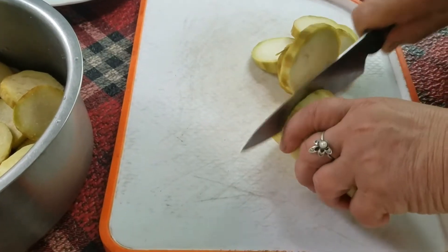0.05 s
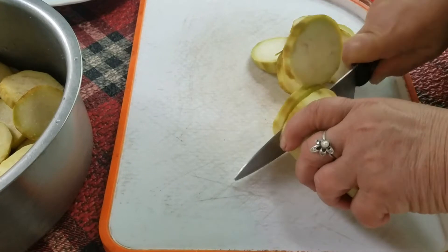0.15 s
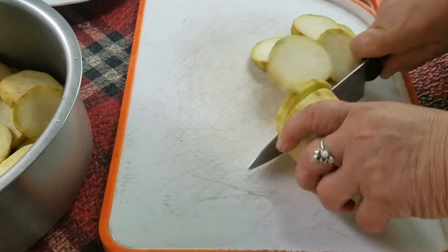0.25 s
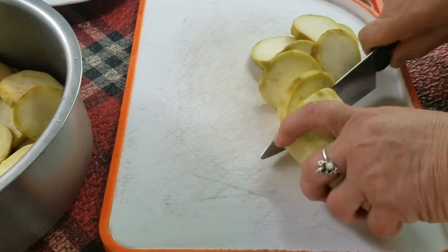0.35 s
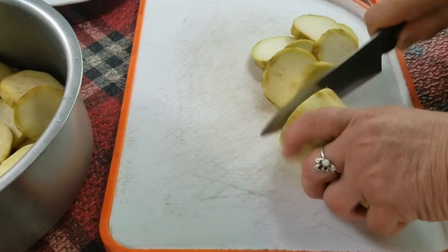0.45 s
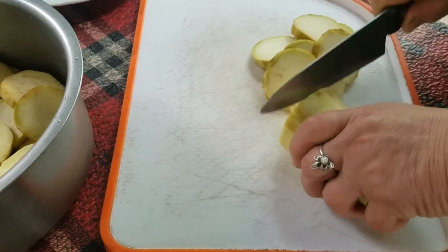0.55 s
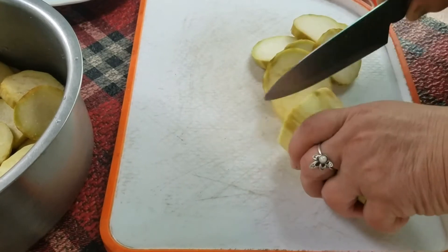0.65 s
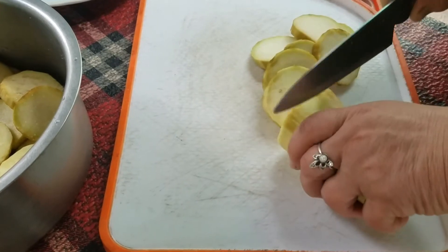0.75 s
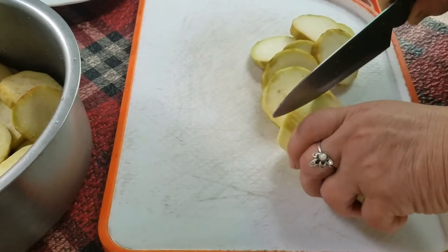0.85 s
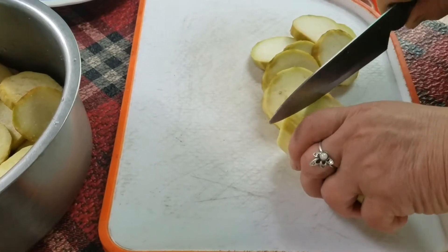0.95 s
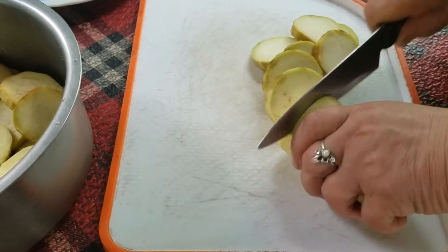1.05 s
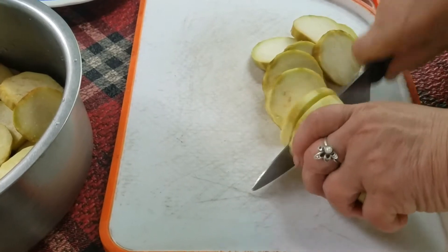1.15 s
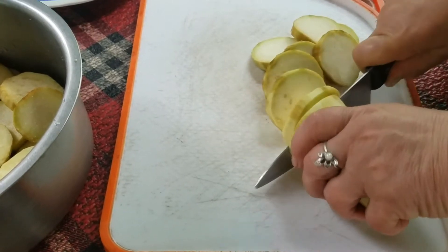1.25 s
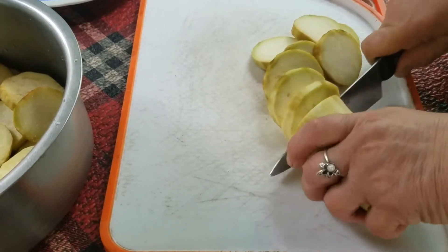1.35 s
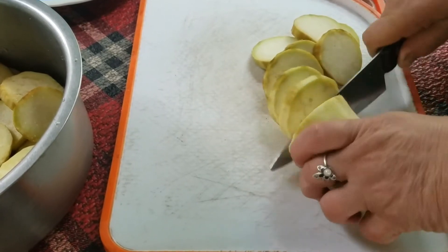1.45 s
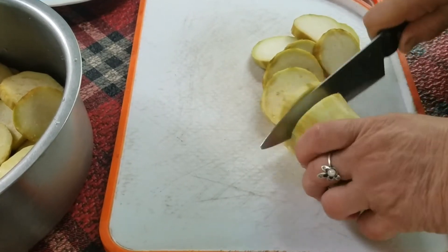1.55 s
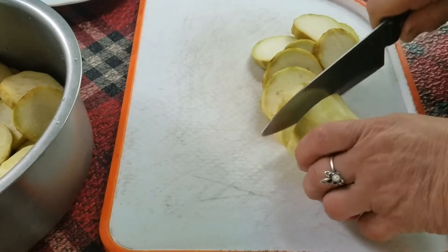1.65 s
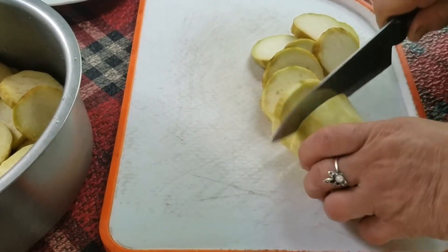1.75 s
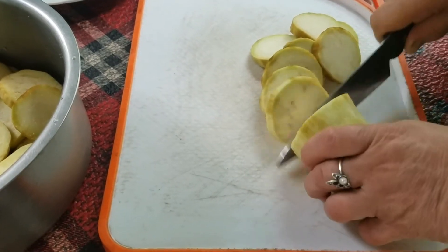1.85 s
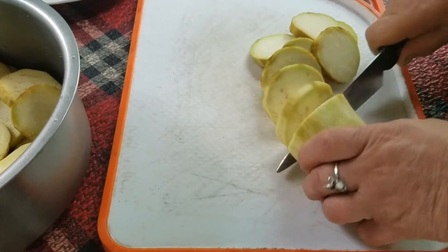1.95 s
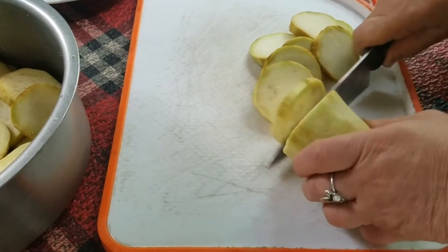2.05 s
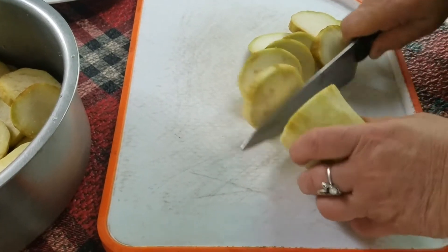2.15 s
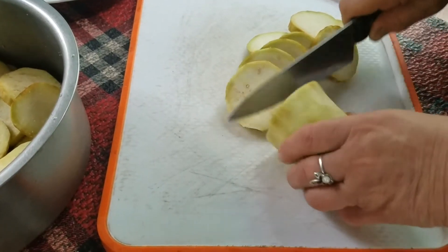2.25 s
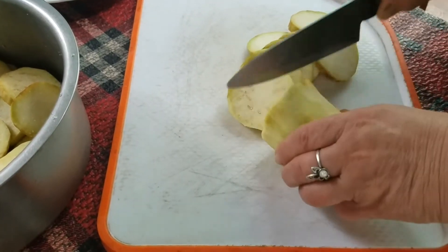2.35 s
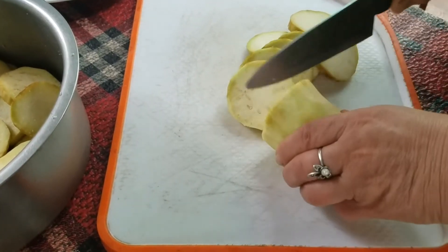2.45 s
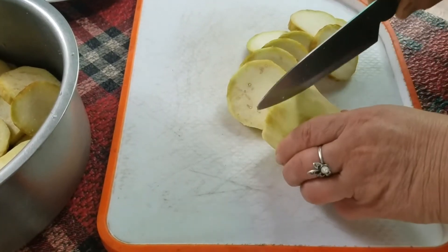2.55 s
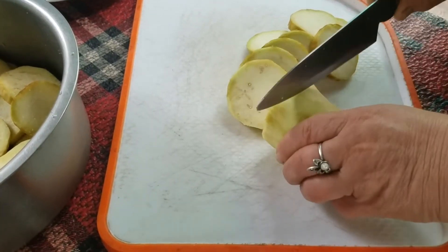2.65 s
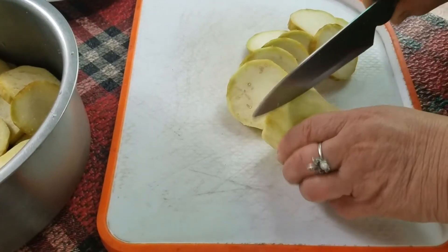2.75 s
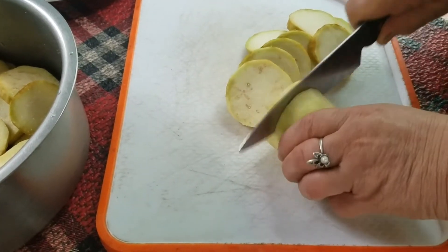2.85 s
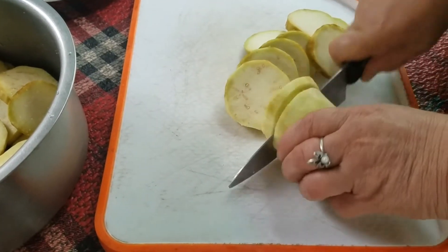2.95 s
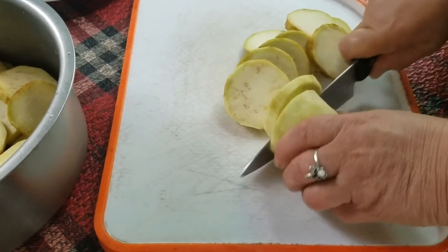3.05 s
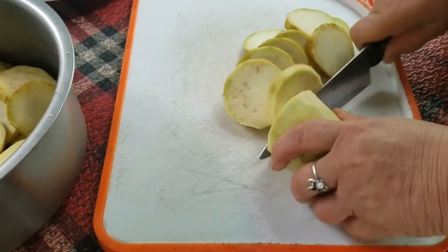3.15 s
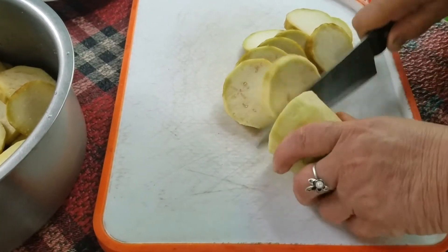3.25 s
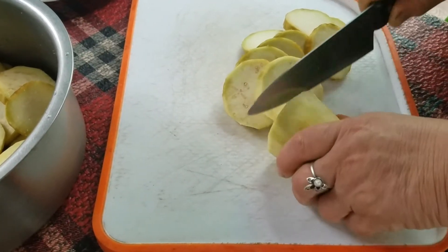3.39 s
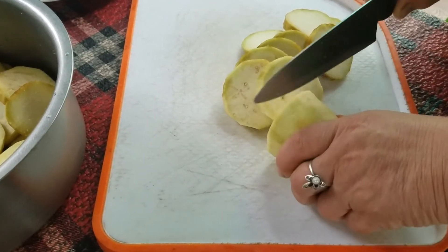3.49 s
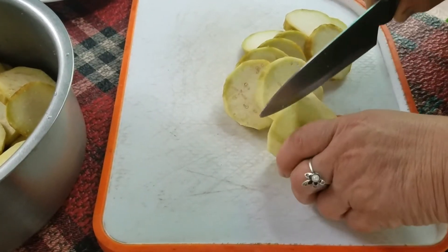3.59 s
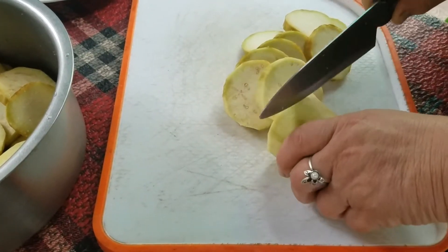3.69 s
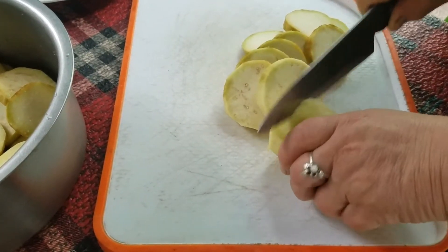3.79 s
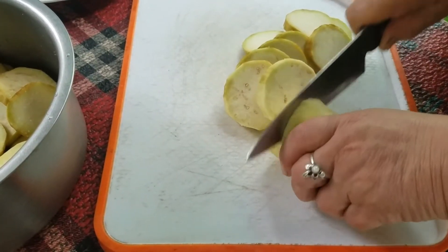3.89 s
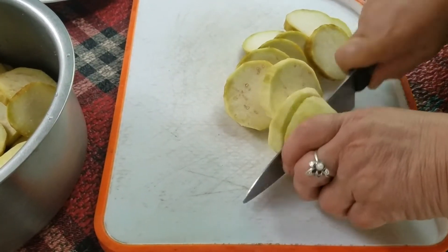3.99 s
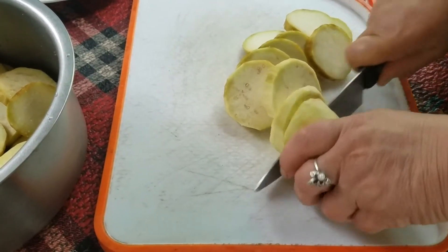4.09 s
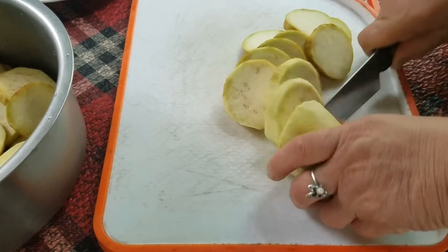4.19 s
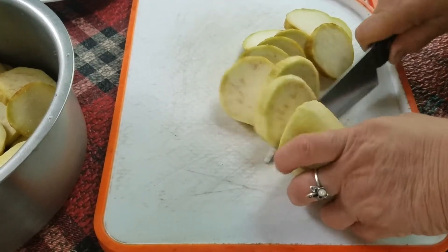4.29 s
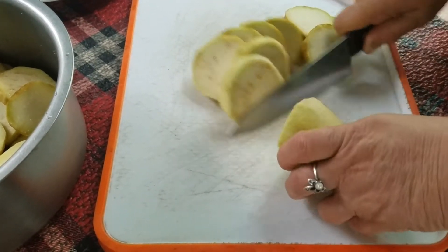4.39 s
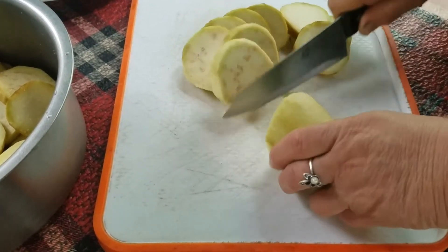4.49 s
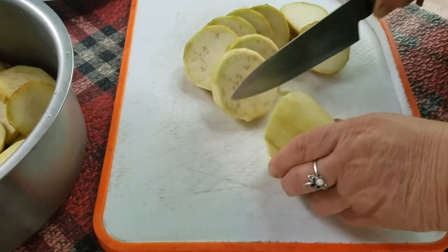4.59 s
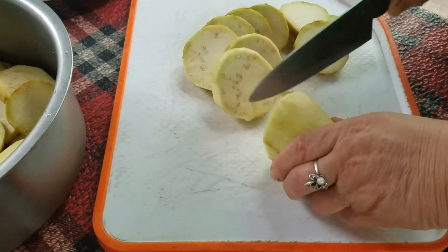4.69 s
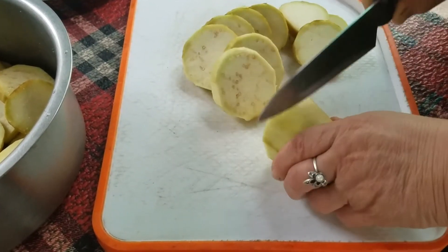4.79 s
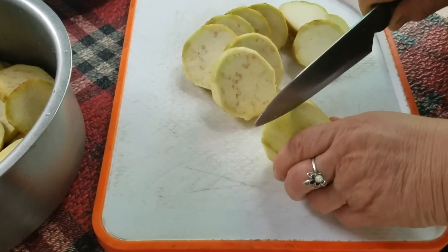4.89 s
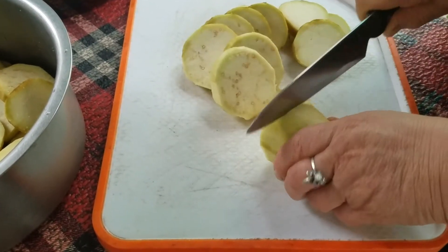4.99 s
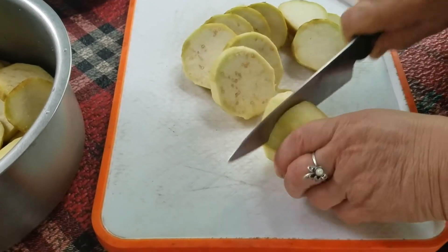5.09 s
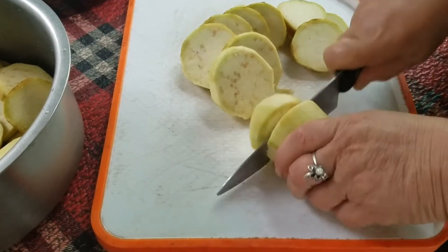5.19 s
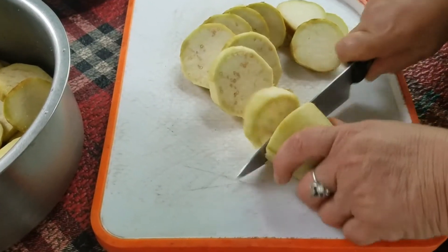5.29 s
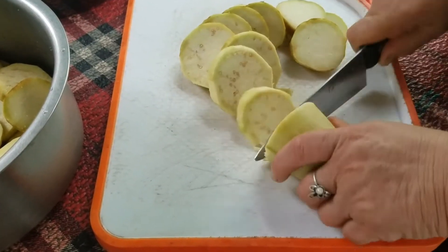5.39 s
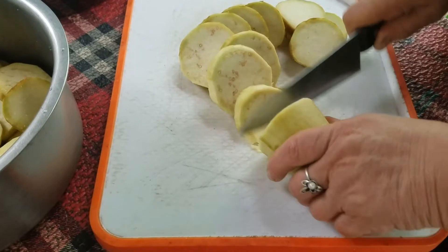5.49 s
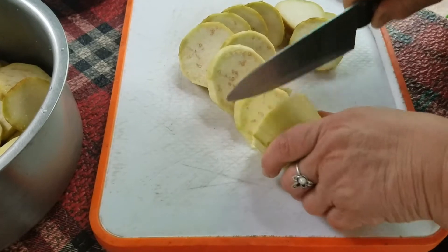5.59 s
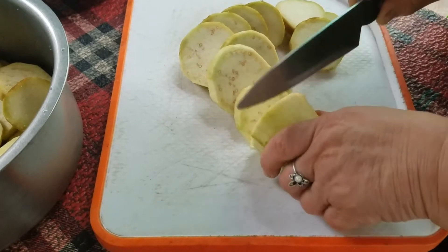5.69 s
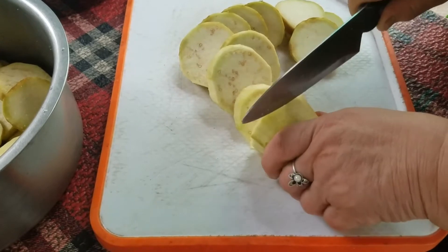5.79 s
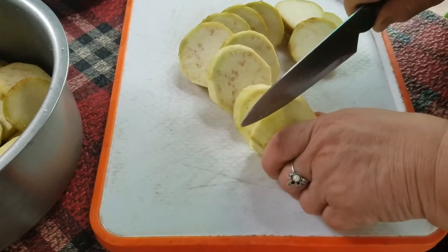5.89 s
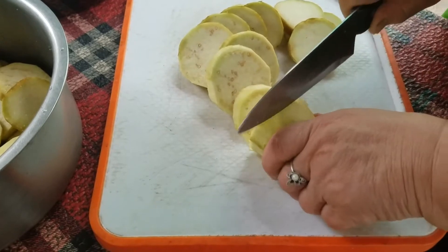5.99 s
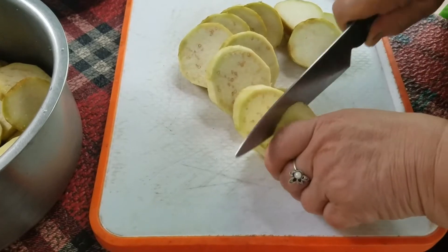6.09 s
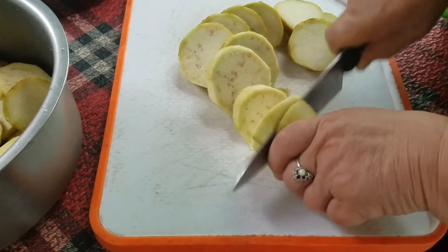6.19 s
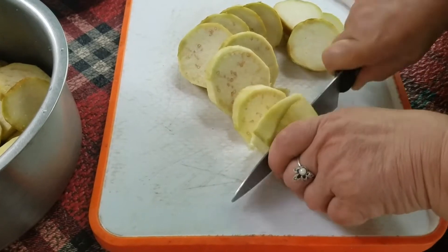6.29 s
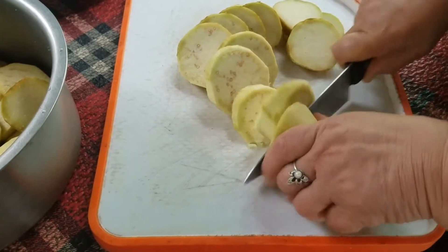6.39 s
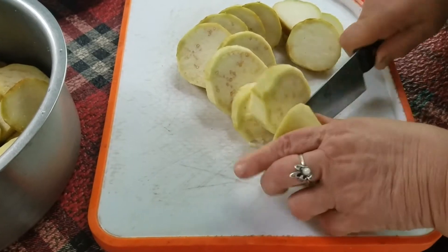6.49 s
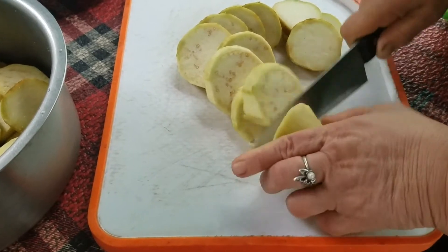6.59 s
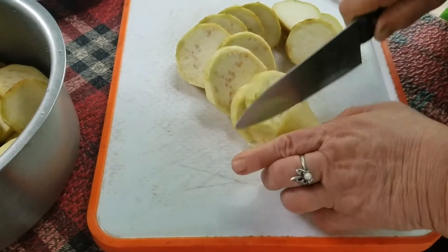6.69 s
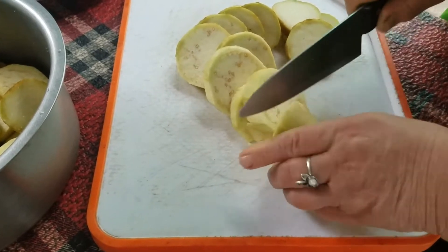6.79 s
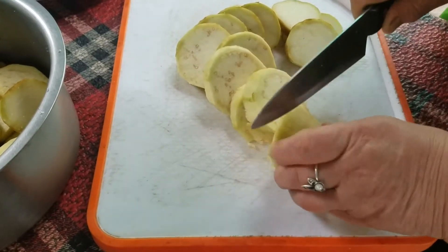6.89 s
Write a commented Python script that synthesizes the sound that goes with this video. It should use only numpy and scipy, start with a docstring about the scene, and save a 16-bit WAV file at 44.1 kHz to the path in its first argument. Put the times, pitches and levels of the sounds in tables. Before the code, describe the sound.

Close stereo microphone, small dry kitchen. A low airy rush with faint hums and uneven rumble continues throughout. Over it, a blade cuts firm, juicy vegetable six times: a gritty crunch swelling into a woody-plastic clack, a tearing slice, a quiet slippery withdrawal. There is a longer gap between the second and third cuts, with a short rasping scrape. Two tiny scrapes follow the fourth, and dull short echoes answer the knocks.

```python
"""In a small kitchen, a knife slices a courgette on a plastic cutting board lying on a cloth, close by.
Six strokes snap the skin, crunch through the flesh as clumped grains and knock on the board's modes;
each slice tears free and the wet blade slides back out. Three short scrapes of the edge shake the board.
Dull echoes and a short tail answer the knife over filtered noise: a rush with hums, rumble and hiss."""
import sys
import numpy as np
from scipy import signal
from scipy.fft import rfft, irfft, next_fast_len
from scipy.io import wavfile
from scipy.ndimage import uniform_filter1d

SR = 44100
rng = np.random.default_rng(int(sys.argv[2]) if len(sys.argv) > 2 else 0)


def output_pcm(signal):
    """Save a mono or channel-first signal as 16-bit PCM at the path in sys.argv[1].

    Samples are clipped to [-1, 1] before scaling.
    """
    pcm = np.clip(np.atleast_2d(signal).T, -1, 1) * 32767
    wavfile.write(sys.argv[1], SR, np.round(pcm).astype(np.int16))


N = 306054  # length [samples]

# In spectra and modes, levels are relative: they shape a layer before its gain is set.

# The edge meets the board: (time [s], force [dB], contact hardness [Hz], settling trim [dB],
# relative table thump [dB], relative edge click [dB], blade ring [Hz], relative blade ring [dB],
# wet split [dB])
CHOPS = [(0.1775, 20, 1490, 3, -7, -4, 2620, -3, -40.5),
         (1.2063, 19.5, 1460, -2.5, -12.5, 3, 1310, -2, -44), (2.986, 23.5, 1500, 0, 2, 1.5, 2700, -1, -32),
         (4.0167, 19.5, 1475, 0, 1, -8, 2320, -15, -35.5), (5.227, 20, 1230, -4.5, 1, -13, 1810, 4, -41),
         (6.277, 19.5, 1670, 1.5, 5, -2.5, 3350, -4, -34)]
# Soft bumps of the blade, damped by the vegetable: (time [s], force [dB], pitch [Hz])
BLADE_BUMPS = [(1.954, 14, 378), (2.809, 13, 226), (2.815, 12, 198), (4.311, 8, 324), (4.337, 7, 400)]
# Modes of the board with the blade on it:
# (frequency [Hz], width [Hz], relative level [dB], left over right [dB])
BOARD_MODES = [(327.4, 23, -4, -4), (455.6, 49, 4.5, -8), (546, 93, 7.5, -2), (673, 46, 7.5, -4),
               (771, 160, -5, 6), (1038, 238, 2.5, 7), (1118, 14, -0.5, -18), (1358, 166, 0.5, -7),
               (1842, 195, 7, -7.5), (2193, 140, 9, -3), (2590, 130, 0.5, 11), (3090, 57, -3, -13),
               (3250, 94, -3, 18)]
# The blade settles after a chop: (delay [s], relative level [dB], hardness [Hz])
SETTLING = [(.0025, -7, 1960), (.0071, -23.5, 9100), (.00926, -2, 570), (0.0113, -5.5, 830)]
# The stroke around each chop: (time in the flesh [s], push build-up [s], juice fizz at full push [dB],
# crunch at full push [dB], board drag at full push [dB], fastest pull-back after the chop [s],
# pull-back gain before the layer mix [dB])
STROKES = [(0.19, 0.1, -49.5, -38.5, -33, 0.13, -62.5), (0.192, 0.075, -52, -39.5, -34.5, 0.17, -63.5),
           (0.179, 0.061, -51.5, -39, -35, 0.13, -63.5), (0.115, 0.045, -50.5, -38, -33, 0.16, -60),
           (.19, .05, -49.5, -41.5, -34.5, .145, -61), (0.113, 0.044, -51.5, -39, -37, .175, -63.5)]
# Small snaps of the skin against the blade: (time [s], fizz [dB], t60 [s])
SKIN_SNAPS = [(1.017, -53, 0.18), (2.802, -48.5, 0.21), (3.815, -53, 0.14), (3.831, -54.5, 0.26),
              (5.031, -50.5, 0.17), (6.041, -51, 0.044), (6.065, -50.5, 0.06), (6.091, -53, .1),
              (6.143, -59, 0.035), (6.171, -59, .15)]
# The blade's high modes: (frequency [Hz], width [Hz], relative level [dB])
STEEL_MODES = [(4910, 41, -1), (5320, 76, 8), (6680, 110, -3.5), (7750, 190, -11), (8500, 83, -1.5),
               (9750, 56, -3), (10600, 94, 1), (11000, 32, -8), (12600, 41, -4), (14100, 56, -7),
               (15000, 58, -1), (15300, 38, -9)]
# Bursting cells: (frequency [Hz], relative level [dB])
FIZZ_SPECTRUM = [(2500, -4), (4000, 5), (5500, -6.5), (8000, 2.5), (9500, -3.5), (13000, 2.5), (15500, -1)]
# Breaking flesh: (frequency [Hz], relative level [dB])
CRUNCH_SPECTRUM = [(500, -3), (900, -3), (1500, 2), (2300, 1), (3000, -6.5), (4500, -10.5), (7000, -28),
                   (12000, -47)]
# The slice comes free: (frequency [Hz], relative level [dB])
SPLIT_SPECTRUM = [(1200, -21), (2200, 3), (3400, 3.5), (4400, -8.5), (6000, -19), (12000, -31)]
# Wet flesh rubbing the flat of the blade: (frequency [Hz], relative level [dB])
SUCK_SPECTRUM = [(1500, 2), (3000, -2), (4100, -9), (5200, -8), (9000, -22)]
# The blade lets go of a slice: (frequency [Hz], relative level [dB])
TICK_SPECTRUM = [(6000, -22), (9500, -12), (11000, 2), (15500, -5)]
# The edge scrapes over the board: (time [s], attack [s], hold [s], starting fizz [dB], rasp [dB],
# drag on the board [dB], blade ring [Hz])
SCRAPES = [(2.055, 0.039, 0.044, -50.5, -34.5, -34.5, 1077), (4.305, 0.0044, 0.032, -63, -47, -47.5, 1884),
           (4.385, 0.0088, 0.032, -51, -40, -43.5, 1863)]
# Edge on textured plastic: (frequency [Hz], relative level [dB])
RASP_SPECTRUM = [(600, -10.5), (1100, 4.5), (1450, 3), (1900, 0), (2700, -8), (4000, -16.5), (7000, -31),
                 (12000, -51)]
# Stereo of the close sounds: (frequency [Hz], left-right likeness)
NEAR_LIKENESS = [(300, 1), (1000, 0.84), (2500, 0.62), (5000, 0.28), (12000, 0.11)]
# Decay of the kitchen: (frequency [Hz], t60 [s])
KITCHEN_DECAY = [(120, 0.3), (500, 0.25), (2000, 0.21), (5000, 0.26), (12000, 0.12)]
# Wall echoes: (delay [s], level before dulling [dB])
WALL_ECHOES = [(0.0193, -22.5), (.0262, -31), (.0355, -21), (.0415, -29)]
# Low rumble: (frequency [Hz], relative level [dB])
RUMBLE_SPECTRUM = [(20, -20), (35, -7), (52, -1), (70, 1), (100, 1.5), (200, 1), (300, -6), (500, -13),
                   (1000, -65.5)]
# Swells of the rumble, before its trim: (time [s], relative level [dB])
RUMBLE_LEVEL = [(0.0, -53.5), (0.6, -63.5), (1.22, -58), (1.82, -62), (2.18, -53.5), (2.42, -48.5),
                (2.9, -44), (3.13, -54), (3.61, -53), (4.02, -44.5), (4.41, -51.5), (5.26, -45.5),
                (5.53, -51.5), (5.86, -51.5), (6.24, -42), (6.63, -52), (6.94, -48)]
# Fan-like rush: (frequency [Hz], relative level [dB])
RUSH_SPECTRUM = [(20, -20), (55, -4.5), (110, -17.5), (300, -2), (520, -3), (800, 2), (1080, 2.5),
                 (1300, -5), (2000, -9.5), (3000, -22), (4300, -29.5), (5400, -31), (7000, -39.5),
                 (12000, -36.5)]
# Swells of the rush, before its trim: (time [s], relative level [dB])
RUSH_LEVEL = [(0.0, -47), (0.6, -52), (1.29, -47), (1.72, -50.5), (2.18, -47.5), (2.94, -48), (3.19, -54.5),
              (3.63, -54.5), (4.02, -46), (4.41, -53.5), (5.22, -44.5), (5.51, -50.5), (5.8, -50.5),
              (6.22, -44), (6.65, -53), (6.94, -52.5)]
# Narrow tones in the rush: (frequency [Hz], width of one of two filter passes [Hz], level [dB])
HUMS = [(1071.5, 32, -61.5), (678.6, 17, -67.5), (51.5, 3.8, -65)]
# Stereo of the rumble and rush: (frequency [Hz], left-right likeness)
BACKGROUND_LIKENESS = [(60, 1), (150, 0.95), (380, 0.7), (950, -0.16), (2380, -0.078), (5980, 0.05),
                       (15000, -0.24)]
# Bands of the airy hiss: (frequency [Hz], width of one of two filter passes [Hz],
# relative level [dB])
AIRY_BANDS = [(3260, 400, 2), (5200, 510, -4), (7350, 540, -9), (11300, 900, -13)]
# The airy hiss swells up: (time [s], hold [s], level [dB])
AIRY_SWELLS = [(.48, 0.38, -66.5), (1.38, .35, -74)]
# Steady faint hiss: (frequency [Hz], relative level [dB])
HISS_SPECTRUM = [(3000, -12), (8000, 5.0), (9500, -16), (13000, 4), (15500, 3)]
# Stereo of the hiss: (frequency [Hz], left-right likeness)
HISS_LIKENESS = [(3000, 0.13)]

PUSH_S = 0.09  # the hand starts to bear down this long before the chop
PUSH_FIZZ_DB, PUSH_CRUNCH_DB, PUSH_DRAG_DB = 7, 11.5, 12  # what the full push adds to each layer
BITE_S, STOP_S = 0.0045, 0.0079  # fade-in at the bite, fade-out once the edge is on the board
PULL_RISE_DB_PER_S, PULL_HOLD_S, PULL_FALL_DB_PER_S = 78, 0.011, 188
SCRAPE_T60_S = 0.11
SCRAPE_BRIGHTEN_DB_PER_S = 112  # the fizz grows as the edge gathers speed
TICK_S, TICK_DB, TICK_T60_S = 1.560, -53, 0.077
TOP_HZ = 16000  # band limit of the output


def amp(db):
    """Decibels to gain."""
    return 10 ** (np.asarray(db) / 20)


def unit(x):
    """Scale to rms 1."""
    return x / np.sqrt(np.mean(x ** 2) + 1e-20)


def along(points, hz):
    """Read a curve of (Hz, value) points on a log frequency axis."""
    f, v = np.transpose(points)
    return np.interp(np.log(hz + 1), np.log(f + 1), v)


def filtered(x, response):
    """Filter x by a complex response of frequency."""
    m = next_fast_len(N + SR // 4)
    f = np.fft.rfftfreq(m, 1 / SR)
    return irfft(rfft(x, m) * response(f), m)[..., :N]


def resonance(f, hz, width):
    """One damped mode: a wider peak rings for a shorter time."""
    return 1j * f * width / (hz * hz - f * f + 1j * f * width)


def contact(f, hardness_hz):
    """A softer contact lasts longer and so holds less treble."""
    return 1 / np.sqrt(1 + (f / hardness_hz) ** 4)


def spread(pair, spectrum, likeness):
    """Turn two unrelated signals into coloured stereo of rms 1, as alike left to right as asked."""
    def colour(f):
        turn = np.arccos(np.clip(along(likeness, f), -1, 1)) / 2
        return amp(along(spectrum, f)) * np.array([np.cos(turn), np.sin(turn)])

    mid, side = filtered(pair, colour)
    return unit(np.array([mid + side, mid - side]))


def grains(rate):
    """Two trains of tiny snaps of uneven size, on average rate a second."""
    return (rng.random((2, N)) < rate / SR) * rng.standard_normal((2, N))


def clumped(rate, rough_db, size):
    """Grains whose loudness swells in bunches about size samples long."""
    wander = unit(uniform_filter1d(rng.standard_normal(N), size=size))
    return amp(rough_db * wander) * grains(rate)


def level(points):
    """One gain per sample from (s, dB) points."""
    return amp(np.interp(np.arange(N) / SR, *np.transpose(points)))


def envelope(s, attack, hold, t60):
    """A gain that rises from time s, holds and dies away."""
    age = np.arange(N) / SR - s
    return np.clip(age / attack, 0, 1) * amp(-60 * np.clip((age - attack - hold) / t60, 0, 2))


def burst(s, db, t60):
    """A gain that jumps up at time s and dies away."""
    age = np.arange(N) / SR - s
    return (age >= 0) * amp(db - 60 * np.clip(age / t60, 0, 2))


def add(track, s, spectrum, size=8192):
    """Put a short sound, given as a spectrum, into the track at time s."""
    lead = size // 16  # room for what falls ahead of the hit
    sound = np.roll(irfft(spectrum), lead, axis=-1)
    start = round(s * SR) - lead
    track[:, start:start + size] += sound[:, :N - start]


def board(f):
    """The board's modes at both ears; chance strengths stand for where it is touched."""
    chance_db = 1.1 * rng.standard_normal(len(BOARD_MODES))
    total = 0
    for (hz, width, db, pan), touch_db in zip(BOARD_MODES, chance_db):
        ears_db = db + touch_db + np.array([[pan], [-pan]]) / 2
        total = total + amp(ears_db) * resonance(f, hz, width)
    return total


def knocks(size=8192):
    """Blows push the board away; the blade settles in softer contacts and the table thumps below."""
    out, f = np.zeros((2, N)), np.fft.rfftfreq(size, 1 / SR)
    for s, db, hardness_hz, settle_db, thump_db, click_db, blade_hz, blade_db, _ in CHOPS:
        again = 0
        for delay, settling_db, hz in SETTLING:
            late = np.exp(-2j * np.pi * f * delay)
            again = again + amp(settling_db + settle_db) * late / (1 + (f / hz) ** 2)
        click = amp(click_db + np.array([[2.5], [-2.5]])) * resonance(f, hz=6350, width=2500)
        # the blade's pitch depends on where the flesh grips it
        blade = amp(blade_db) * resonance(f, blade_hz, width=160)
        ring = (board(f) + blade + click) * (1 + again) * contact(f, hardness_hz)
        table = amp(thump_db + 3.5) * resonance(f, hz=143.0, width=25.7)
        crack = amp(-38) * resonance(f, hz=11000, width=9000)  # steel biting into plastic
        add(out, s, amp(db) * (table - ring + crack))
    for s, db, hz in BLADE_BUMPS:
        bump = resonance(f, hz, width=106) * contact(f, hardness_hz=1500)
        add(out, s, -amp([[db], [db]]) * bump)
    return out


def fizz(steel_db):
    """Dense tiny snaps, heard directly and through the blade's high modes."""
    def blade(f):
        return sum(amp(db) * resonance(f, hz, width) for hz, width, db in STEEL_MODES)

    snaps = spread(grains(rate=16000), FIZZ_SPECTRUM, NEAR_LIKENESS)
    steel = unit(filtered(snaps, blade))
    return unit(snaps + amp(steel_db) * steel)


def drag(hardness_hz):
    """Small slips of the blade shake the board, with its upper modes dulled."""
    slips = grains(rate=2000)[0]
    return unit(filtered(slips, lambda f: board(f) * contact(f, hardness_hz)))


def slicing():
    """The blade snaps the skin, cuts through the flesh, frees the slice and slides back out."""
    # fibres give way in bunches
    crunch = spread(clumped(rate=5000, rough_db=1.7, size=220), CRUNCH_SPECTRUM, NEAR_LIKENESS)
    juice = fizz(steel_db=-11.0)
    return (skin_snaps(crunch) + cutting(juice, crunch) + splits()
            + sliding_back(juice, crunch) + wet_tick())


def skin_snaps(crunch):
    """The skin gives way against the blade in short spits of fizz and crunch."""
    gain = sum(amp(db) * envelope(s, attack=0.0034, hold=0.0034, t60=t60) for s, db, t60 in SKIN_SNAPS)
    return gain * (fizz(steel_db=-13) + amp(4.0) * crunch)


def cutting(juice, crunch):
    """The blade tears flesh; as the hand bears down it fizzes, crunches and loads the board more."""
    t, out, body = np.arange(N) / SR, np.zeros((2, N)), drag(hardness_hz=467)
    for (s, *_), (length, build, fizz_db, crunch_db, drag_db, _, _) in zip(CHOPS, STROKES):
        slack = 1 - np.clip((t - s + PUSH_S) / build, 0, 1)  # 1 before the push, 0 at full push
        bite = np.clip((t - s + length) / BITE_S, 0, 1)
        stop = np.clip(1 - (t - s) / STOP_S, 0, 1)
        layers = amp(fizz_db - PUSH_FIZZ_DB * slack) * juice
        layers = layers + amp(crunch_db - PUSH_CRUNCH_DB * slack) * crunch
        layers = layers + amp(drag_db - PUSH_DRAG_DB * slack) * body
        out += bite * stop * layers
    return out


def splits():
    """As each knock lands the slice tears free with a short wet crunch."""
    gain = sum(burst(s, db, t60=0.16) for s, *_, db in CHOPS)
    return gain * spread(grains(rate=3500), SPLIT_SPECTRUM, NEAR_LIKENESS)


def pulling():
    """Gain of the blade sliding out: it gathers speed after each chop, then leaves the flesh."""
    t, total = np.arange(N) / SR, 0
    for (s, *_), (*_, delay, db) in zip(CHOPS, STROKES):
        late = t - s - delay  # time from the fastest moment
        rise_db = PULL_RISE_DB_PER_S * np.minimum(late, 0)
        fall_db = PULL_FALL_DB_PER_S * np.maximum(late - PULL_HOLD_S, 0)
        total = total + (t > s) * amp(db + rise_db - fall_db)
    return total


def sliding_back(juice, crunch):
    """Wet flesh rubs the flat of the withdrawing blade in bunched grains, over fizz and crunch."""
    suck = spread(clumped(rate=2700, rough_db=1.0, size=500), SUCK_SPECTRUM, NEAR_LIKENESS)
    return pulling() * (amp(3.5) * juice + amp(7.5) * crunch + amp(0.5) * suck)


def wet_tick():
    """A thin wet tick of bright grains as the blade lets go of a slice."""
    gain = burst(TICK_S, TICK_DB, TICK_T60_S)
    return gain * spread(grains(rate=4000), TICK_SPECTRUM, NEAR_LIKENESS)


def scraping():
    """The edge chatters sideways over the textured plastic and the blade rings with it."""
    t, out = np.arange(N) / SR, np.zeros((2, N))
    hiss = fizz(steel_db=-5)
    rasp = spread(clumped(rate=3000, rough_db=1, size=130), RASP_SPECTRUM, NEAR_LIKENESS)
    body = drag(hardness_hz=440)
    for s, attack, hold, fizz_db, rasp_db, drag_db, hz in SCRAPES:
        pressure = envelope(s, attack, hold, SCRAPE_T60_S)
        grip = np.clip((t - s) / attack, 0, 1)  # the chatter follows the first dull contact
        speed_db = SCRAPE_BRIGHTEN_DB_PER_S * np.clip(t - s - attack, 0, hold)
        ring = unit(filtered(rasp, lambda f: resonance(f, hz, width=17)))
        chatter = amp(fizz_db + speed_db) * hiss + amp(rasp_db) * (rasp + amp(-6.5) * ring)
        out += pressure * (grip * chatter + amp(drag_db) * body)
    return out


def kitchen(x):
    """A few dull wall echoes and a short diffuse tail of decaying noise."""
    def walls(f):
        echoes = sum(amp(db) * np.exp(-2j * np.pi * f * delay) for delay, db in WALL_ECHOES)
        return contact(f, hardness_hz=1560) * echoes

    mono = x.mean(0)
    hz, t, z = signal.stft(rng.standard_normal((2, SR // 3)), SR, nperseg=256)
    decay = amp(-60 * t / along(KITCHEN_DECAY, hz)[:, None])
    build = 1 - np.exp(-t / 0.0024)
    tail = signal.istft(z * decay * build, SR, nperseg=256)[1]
    tail = tail / np.linalg.norm(tail[0])
    mid, side = signal.fftconvolve(mono[None], tail, axes=1)[:, :N]
    side = filtered(side, lambda f: f / np.hypot(f, 800))  # long waves reach both ears alike
    return filtered(mono, walls) + amp(-18.5) * np.array([mid + side, mid - side])


def noise():
    """Two unrelated channels of white noise."""
    return rng.standard_normal((2, N))


def rumble():
    """Low-shaped noise that swells unevenly."""
    return amp(2.0) * level(RUMBLE_LEVEL) * spread(noise(), RUMBLE_SPECTRUM, BACKGROUND_LIKENESS)


def rush():
    """Fan-like shaped noise that rises and falls."""
    return amp(5.0) * level(RUSH_LEVEL) * spread(noise(), RUSH_SPECTRUM, BACKGROUND_LIKENESS)


def hums():
    """Noise through narrow resonances, two passes each, gives wavering tones in the middle."""
    total = 0
    for hz, width, db in HUMS:
        tone = filtered(rng.standard_normal(N), lambda f: resonance(f, hz, width) ** 2)
        total = total + amp(db) * unit(tone)
    return total


def faint_hiss():
    """Steady high noise, joined at times by a swell of airy bands."""
    def bands(f):
        return sum(amp(db) * resonance(f, hz, width) ** 2 for hz, width, db in AIRY_BANDS)

    hiss = amp(-74.5) * spread(noise(), HISS_SPECTRUM, HISS_LIKENESS)
    airy = unit(filtered(noise(), bands))
    swells = sum(amp(db) * envelope(s, attack=0.066, hold=hold, t60=.4) for s, hold, db in AIRY_SWELLS)
    return hiss + swells * airy


def background():
    """Layers of shaped noise: a fan-like rush with narrow hums, a low rumble and faint hiss."""
    return rumble() + rush() + hums() + faint_hiss()


def scene():
    """Knife on board in the kitchen; the cutting and scraping lean a little to the right."""
    knife = knocks() + (slicing() + scraping()) * amp([[-.4], [.4]])
    return knife + kitchen(knife) + background()


def record(dry):
    """The sharpest peaks are rounded off at full scale; nothing above the band limit is kept."""
    rounded = dry / (1 + np.abs(dry) ** 8) ** (1 / 8)
    return filtered(rounded, lambda f: f < TOP_HZ)


dry = scene()
out = record(dry)
output_pcm(out)
```